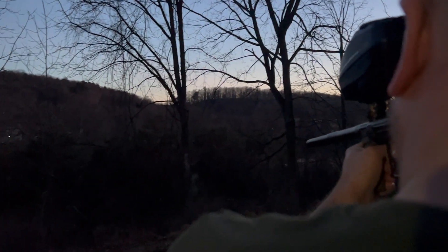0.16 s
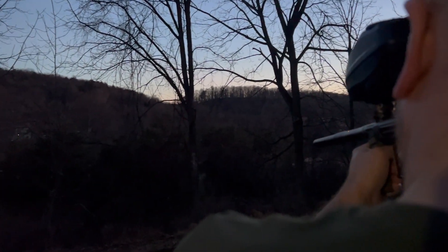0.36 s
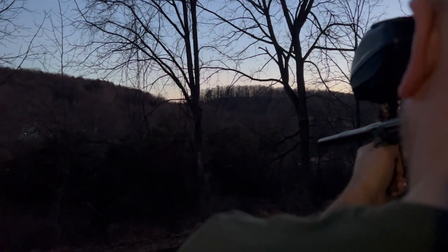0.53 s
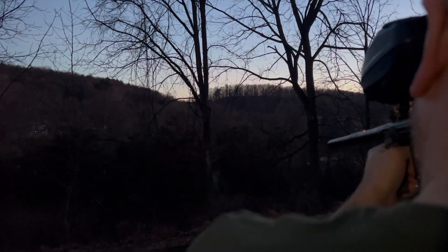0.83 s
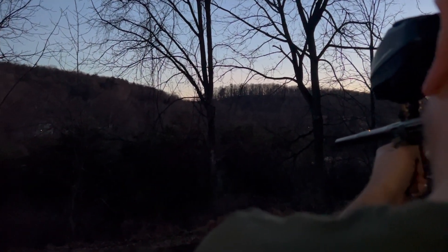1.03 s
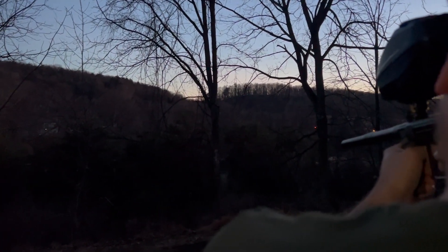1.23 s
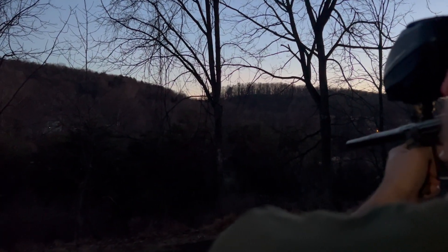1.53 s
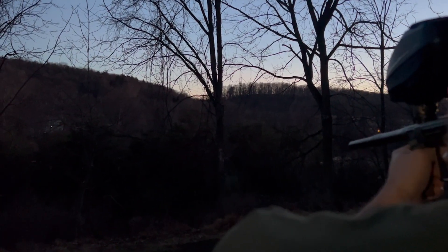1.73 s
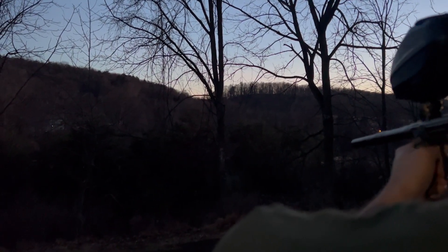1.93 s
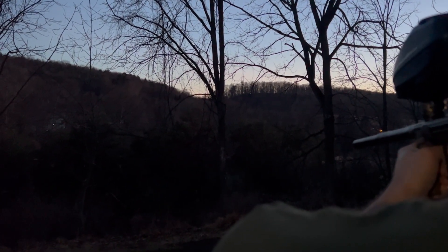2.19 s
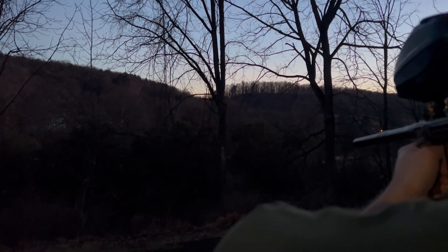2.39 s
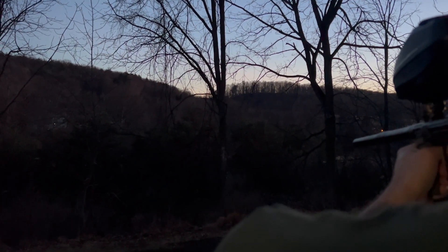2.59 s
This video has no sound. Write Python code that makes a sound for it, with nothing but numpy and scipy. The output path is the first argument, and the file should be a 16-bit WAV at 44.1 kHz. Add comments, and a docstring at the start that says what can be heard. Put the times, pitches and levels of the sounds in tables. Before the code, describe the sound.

A paintball marker fires right beside the microphone, each shot a sharp, gassy pop. After a fast opening run it slows to about half the pace, with faint trigger clicks between shots and a dull echo from wooded hills.

```python
"""An electronic paintball marker fires right beside a stereo microphone, among trees and wooded hills.
It opens at ten shots a second. In each the solenoid ticks, the bolt slides forward, gas cracks out of
the valve, the barrel booms and the ball pops out; the nearby trees then scatter the shot.
After about a second the pace drops to some five and a half a second, with the trigger clicking between
shots. The dull wash from the hills lasts to the end."""
import sys
import numpy as np
from scipy import signal
from scipy.fft import rfft, irfft
from scipy.io import wavfile

SR = 44100
rng = np.random.default_rng(int(sys.argv[2]) if len(sys.argv) > 2 else 0)


def transcribe(u):
    """Save the signal u as a 16-bit wav file named by the first command-line argument.

    u: samples, shape (n,) or (channels, n), limited to [-1, 1]; the rate is SR.
    q: integer samples, one column per channel.
    """
    v = np.clip(np.atleast_2d(u).T, -1, 1)
    q = np.round(v * 32767).astype(np.int16)
    wavfile.write(sys.argv[1], SR, q)


N = 121275
T = np.arange(N) / SR
HZ = np.maximum(np.fft.rfftfreq(N, 1 / SR), 1)

# The string of shots. Each row: time in seconds, relative levels of the boom and of the gas in dB.
SHOTS = [(-.005, -1, -22), (0.0929, 0, -0.5), (0.1913, 0.5, 1), (.2898, -.3, -2), (0.3874, 0.1, 2),
         (0.4857, 0.3, -1), (0.5841, -0.3, 1), (0.6821, -2, -0.5), (.8001, -0.6, 0), (0.8982, -1.5, 0.5),
         (1.0112, -2, 0), (1.216, -1.2, 0.5), (1.3673, -2.5, -1.5), (1.5725, -1, -1), (1.7531, -0.7, -1),
         (1.917, -1, -1.5), (2.1209, -0.9, 1), (2.2793, -0.4, 0.5), (2.4642, -0.8, 0.5),
         (2.6387, -1.3, 1.5), (2.7374, -1.7, 0.5)]
SHOT_TIMES, BOOM_DB, GAS_DB = np.array(SHOTS).T
EVEN_DB = np.zeros(len(SHOTS))


def undb(db):
    """Decibels to gain."""
    return 10 ** (np.asarray(db) / 20)


def unit(x):
    """Scale to rms 1."""
    return x / np.sqrt(np.mean(x ** 2))


def curve(points):
    """(Hz, value) points joined on a log-frequency axis."""
    hz, value = np.array(points, float).T
    return np.interp(np.log(HZ), np.log(np.maximum(hz, 1)), value)


def noise(colour, width=0.23):
    """Stereo noise of rms 1, shaped by (Hz, dB) points; width is side over mid."""
    mid, side = irfft(rfft(rng.standard_normal((2, N))) * undb(curve(colour)), N)
    return unit(np.array([mid + width * side, mid - width * side]))


def envelope(t, rise, hold, t60):
    """Straight rise, hold, exponential release."""
    return np.clip(t / rise, 0, 1) * np.exp(-np.log(1000) * np.maximum(t - rise - hold, 0) / t60)


def play(times, dbs, shape):
    """One copy of shape(age) from each time on, at its level."""
    out = np.zeros(N)
    for start, db in zip(times, dbs):
        span = slice(*np.searchsorted(T, [start, start + .5]))
        out[span] += undb(db) * shape(T[span] - start)
    return out


def tone(hz, rise, hold, t60, phase=0):
    """A damped sine as a function of its age."""
    return lambda t: np.sin(2 * np.pi * hz * t + phase) * envelope(t, rise, hold, t60)


def rings(table, shot_db):
    """Damped tones that every shot sets off."""
    return sum(play(SHOT_TIMES + delay, shot_db + db, tone(hz, rise, hold, t60))
               for delay, hz, db, rise, hold, t60 in table)


def bursts(table, colour, shot_db, scatter_s=0.0001, scatter_db=2):
    """Puffs of turbulent gas, a little different in every shot."""
    flow = 0
    for delay, db, rise, hold, t60 in table:
        late, loud = rng.standard_normal((len(SHOTS), 2)).T
        times = SHOT_TIMES + delay + scatter_s * late
        dbs = shot_db + db + scatter_db * loud
        flow = flow + play(times, dbs, lambda t: envelope(t, rise, hold, t60))
    return flow * noise(colour)


def hills(bands=7, flicker_db=2.2, flicker_hz=22):
    """Far echoes off the hills, merged into a dull wash of noise that flickers octave by octave."""
    # Spectrum of the wash. Each row: frequency in Hz, relative level in dB.
    colour = [(25, -38), (60, -24), (150, -19), (250, -12.5), (330, -6.5), (370, 1), (430, -7), (500, 3),
              (560, -2), (720, -7.5), (930, -4.5), (1500, -14.5), (2600, -21.5), (4000, -30.5),
              (8000, -32.5), (16000, -40)]
    # Swell of the wash. Each row: time in seconds, level in dB.
    swell = [(0, -30.5), (.2, -29.5), (.33, -37), (.45, -32.5), (1.15, -32), (1.24, -38.5), (1.32, -36.5),
             (1.39, -31.5), (1.47, -33.5), (1.8, -33.5), (2.04, -30.5), (2.2, -32.5), (2.75, -32.5)]
    wash, out = rfft(noise(colour)), 0
    octave = np.clip(np.log2(HZ / 125), 0, bands - 1)
    for k in range(bands):
        band = irfft(wash * np.maximum(1 - abs(octave - k), 0), N)
        flicker = unit(irfft(rfft(rng.standard_normal(N)) * np.exp(-(HZ / flicker_hz) ** 2), N))
        out = out + band * undb(flicker_db * flicker)
    return unit(out) * undb(np.interp(T, *np.array(swell).T))


def trees(gain_db=-21, split_hz=830, bass_t60=0.19, treble_t60=0.11):
    """Nearby ground and trunks scatter each shot into a short tail whose treble dies first."""
    # Spectrum of the tail. Each row: frequency in Hz, relative level in dB.
    colour = [(60, 5.5), (150, 0.5), (280, 10.5), (500, -8), (1000, -7), (2000, -10), (4000, -17),
              (7000, -13.5), (12000, -17.5), (16000, -29)]
    scatter, out = rfft(noise(colour, width=0.21)), 0
    bass = 1 / (1 + (HZ / split_hz) ** 4)
    for share, t60 in ((bass, bass_t60), (1 - bass, treble_t60)):
        tails = play(SHOT_TIMES, BOOM_DB, lambda t: envelope(t, rise=0.0048, hold=0, t60=t60))
        out = out + irfft(scatter * share, N) * tails
    return undb(gain_db) * out


def trigger(gain_db=-4, edge_db=-5, bounce_s=0.00302, bounce_db=-6):
    """The trigger clicks: a short ring with a noisy edge, then one small bounce."""
    # The clicks. Each row: start in seconds, relative level in dB, pitch as a ratio.
    clicks = [(0.9589, -17, 1.23), (1.0875, -24, 1.22), (1.1776, -20.5, 0.83), (1.2761, -13, 0.93),
              (1.4922, -29, 1.2), (1.6319, -16, 0.99), (1.852, -22, 1.01), (2.031, -18, 1),
              (2.204, -19, 1.07), (2.399, -19.5, 0.98), (2.564, -19, 1.05)]
    # Modes of the trigger. Each row: frequency in Hz at pitch 1, relative level in dB, t60 in seconds.
    modes = [(2026, -2, 0.0069), (2749, -2, 0.0081), (3450, -1, .008), (4000, -0.5, 0.0086),
             (5250, -8, 0.0053)]
    # Spectrum of the edge. Each row: frequency in Hz, relative level in dB.
    colour = [(500, -10), (2000, -1), (4500, 4), (8000, -10.5), (12000, -7), (16000, -20)]
    ring, edge = 0, 0
    for start, db, pitch in clicks:
        times, dbs = [start, start + bounce_s], np.array([db, db + bounce_db])
        edge = edge + play(times, dbs + edge_db, lambda t: envelope(t, rise=0.0001, hold=0, t60=0.012))
        for hz, mode_db, t60 in modes:
            mode = tone(hz * pitch, rise=0.0002, hold=0, t60=t60, phase=rng.uniform(0, 2 * np.pi))
            ring = ring + play(times, dbs + mode_db, mode)
    return undb(gain_db) * (ring + edge * noise(colour))


def solenoid():
    """The solenoid ticks just ahead of each shot, always equally hard."""
    # Each row: delay in seconds, frequency in Hz, level in dB, then rise, hold and t60 in seconds.
    tick_tones = [(-.0245, 2784, -17, 0.00054, 0.00085, 0.0038),
                  (-.0245, 3650, -26, 0.00017, 0.00032, 0.0055), (-.0243, 516, -26, .001, 0.004, 0.015),
                  (-.0215, 212, -23.5, 0.00058, 0.0029, 0.051)]
    return rings(tick_tones, EVEN_DB)


def bolt():
    """The bolt slides forward with two soft puffs of gas."""
    # Each row: delay in seconds, level in dB, then rise, hold and t60 in seconds.
    puffs = [(-.0245, -22.5, 0.00054, 0.00038, 0.022), (-.0185, -26, 0.00033, 0.0015, 0.033)]
    # Spectrum of the puffs. Each row: frequency in Hz, relative level in dB.
    colour = [(200, 5), (600, 13), (1500, 1), (3000, 5), (4500, -6.5), (7500, -7.5), (12000, -8),
              (16000, -22)]
    return bursts(puffs, colour, EVEN_DB)


def valve(crack_db=-1, body_delay_s=-0.0026, body_rise_s=0.002):
    """Gas cracks out of the valve and the marker's body rings with it."""
    # Each row: delay in seconds, relative level in dB, then rise, hold and t60 in seconds.
    puffs = [(-.0047, -27, .0004, .002, .006), (-.0029, -14.5, .0003, .0003, .006),
             (.0002, -10.5, .0003, .0008, .0055), (.002, -26, .001, .001, .03)]
    # Spectrum of the gas. Each row: frequency in Hz, relative level in dB.
    colour = [(200, -2), (900, 1.5), (1400, -9), (2100, -1), (4200, -9), (7500, -2.5), (8500, 3.5),
              (9500, -5), (10600, -6.5), (11700, 2), (13500, -6.5), (15400, -8), (16600, -39)]
    # Each row: frequency in Hz, relative level in dB, t60 in seconds.
    body_modes = [(1000, -24.5, 0.047), (1597, -32.5, 0.081), (1908, -30.5, 0.035), (2126, -32, 0.054),
                  (2710, -50, .035), (5060, -37, 0.057), (6097, -31.5, 0.065), (7240, -48, .018),
                  (8600, -21, 0.015)]
    body_tones = [(body_delay_s, hz, db, body_rise_s, 0, t60) for hz, db, t60 in body_modes]
    return bursts(puffs, colour, GAS_DB + crack_db) + rings(body_tones, GAS_DB)


def barrel():
    """The barrel booms, then the ball pops out of the muzzle."""
    # Each row of both: delay in seconds, frequency in Hz, relative level in dB,
    # then rise, hold and t60 in seconds.
    boom_tones = [(-.0031, 284, -8, 0.0062, 0.0076, 0.011), (-.0016, 595, -19, 0.00069, .007, 0.01),
                  (-.0014, 769, -22, 0.0016, 0.0015, .016), (.001, 350, -23, 0.0018, 0.0027, 0.027),
                  (.011, 224.2, -28, 0.0045, 0.0043, 0.16)]
    pop_tones = [(0.0069, 110, -13, 0.0014, 0.0017, 0.036), (0.0067, 142, -23, 0.0012, .001, 0.027),
                 (0.00754, 400, -9, 0.00089, 0.00099, 0.024), (0.0062, 47, -27.5, .003, 0.0024, 0.059)]
    return rings(boom_tones + pop_tones, BOOM_DB)


def scene():
    """The marker at the microphone, the trees close by, the hills far off."""
    marker = solenoid() + bolt() + valve() + barrel()
    return marker + trigger() + trees() + hills()


def record(dry, low_cut_hz=49, ceiling=0.83, top_hz=16600):
    """The microphone's two ports differ in level and phase; peaks are rounded, deep bass and top cut."""
    # Balance of the ports. Each row: frequency in Hz, left minus right in dB.
    balance = [(60, -0.5), (110, -1.5), (200, -1.0), (380, -2), (700, -4), (1290, -1), (2380, 0),
               (4400, 2.5), (8120, 1.0), (15000, -1)]
    # Phase between the ports. Each row of both: frequency in Hz, lead of the left in radians.
    phase_low = [(20, 0), (70, -0.1), (140, -0.23), (280, -0.32), (550, -0.4), (1000, -0.66), (3300, 0.61),
                 (6400, 0.74)]
    phase_high = [(8200, .3), (10250, -3.14), (12000, -6.28), (13850, -9.42), (15400, -12.5)]
    # Each port takes half of the difference.
    left = undb(curve(balance) / 2) * np.exp(1j * curve(phase_low + phase_high) / 2)
    heard = irfft(rfft(dry) * np.array([left, 1 / left]), N)
    heard = signal.sosfilt(signal.butter(4, low_cut_hz, "high", fs=SR, output="sos"), heard)
    heard = heard / (1 + (heard / ceiling) ** 8) ** (1 / 8)
    return signal.sosfilt(signal.ellip(8, .2, 80, top_hz, fs=SR, output="sos"), heard)


dry = scene()
out = record(dry)
transcribe(out)
```